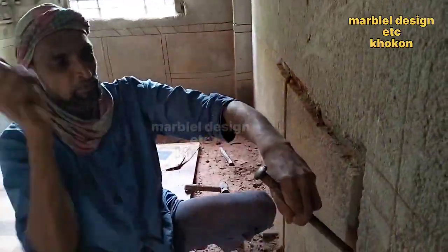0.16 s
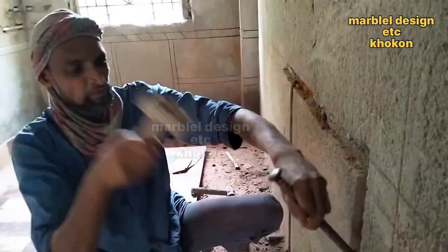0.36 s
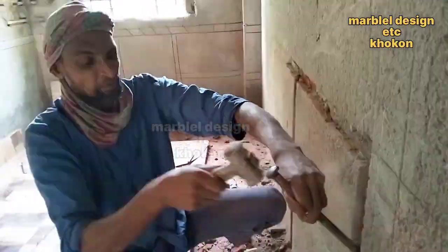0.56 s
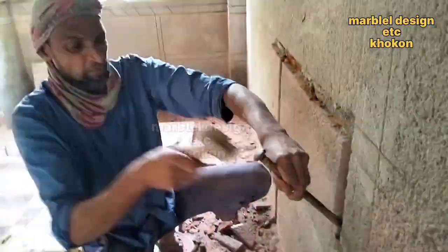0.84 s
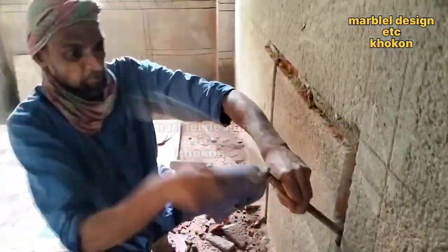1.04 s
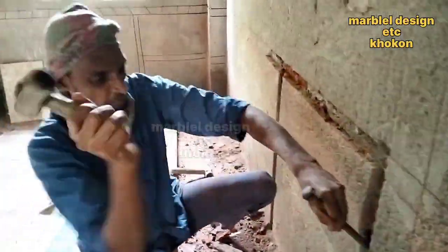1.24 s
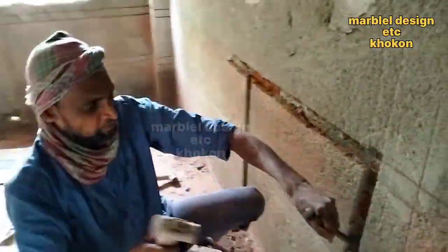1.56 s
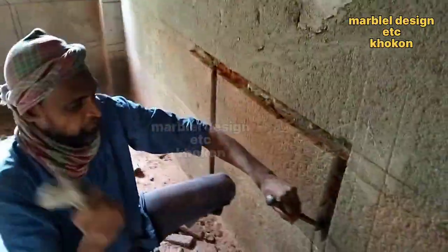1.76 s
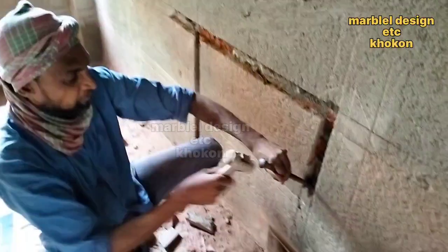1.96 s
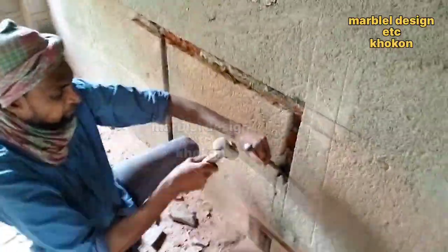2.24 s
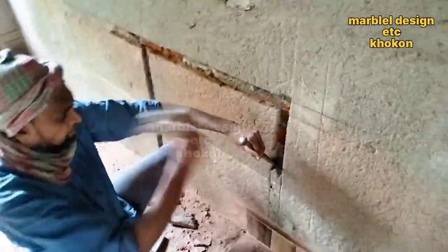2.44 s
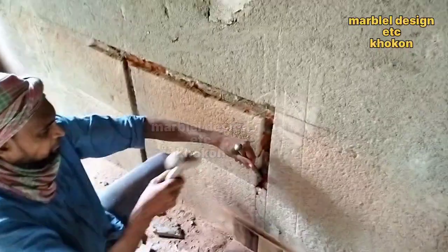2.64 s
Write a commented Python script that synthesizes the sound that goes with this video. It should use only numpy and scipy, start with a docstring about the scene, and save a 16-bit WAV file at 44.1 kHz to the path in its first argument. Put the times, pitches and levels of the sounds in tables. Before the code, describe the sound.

A hammer strikes a steel chisel into a brick wall: five blows, a pause, three more

```python
"""Hammer and chisel on a brick wall

A hammer drives a steel chisel into plastered brick in a bare room: five blows, a pause, three more.
Each blow is gritty noise for crushed masonry, narrow noise bands for the ringing steel and brick,
a thump with decaying sines for the wall, and low bands plus a diffuse tail for the room.
Sharp snaps mark breaking brick; small gritty noises are the chisel scraping and plaster chips falling.
"""
import sys
import numpy as np
from scipy import signal
from scipy.fft import rfft, irfft
from scipy.io import wavfile
from scipy.ndimage import uniform_filter1d

SR = 44100
rng = np.random.default_rng(int(sys.argv[2]) if len(sys.argv) > 2 else 0)


def dump_mix(stems):
    """Bounce the given channels to the path in sys.argv[1] as a 16-bit WAV at rate SR."""
    frames = np.atleast_2d(stems).T  # one column per channel
    limited = np.clip(frames, -1, 1)  # hard clip at full scale
    pcm = np.round(limited * 32767).astype(np.int16)
    wavfile.write(sys.argv[1], SR, pcm)


N = 123480
T = np.arange(SR) / SR  # each sound lasts up to 1 s
HZ = np.fft.rfftfreq(SR, 1 / SR)
MIX_HZ = np.fft.rfftfreq(N, 1 / SR)

# spectrum of crushed masonry: f/Hz, relative density/dB per Hz
CRUNCH_SPECTRUM = [(40, 0.5), (150, 4.5), (350, 2), (600, 4.5), (1300, 1.5), (2000, 0.5), (2800, 4.5),
                   (3600, -0.5), (4500, 2.5), (6200, -1), (7200, -8), (8400, -9.5), (9000, -20.5),
                   (10600, -25), (11600, -19), (13300, -25), (14300, -19), (16000, -34)]
# decay of the room's reverberation: f/Hz, t60/s
ROOM_T60 = [(60, 0.62), (160, 1), (350, 0.94), (600, 0.55), (1200, 0.42), (3000, 0.28), (6000, 0.25),
            (8500, 0.076), (15000, .16)]


def amp(db):
    """Decibels to amplitude gain."""
    return 10 ** (np.asarray(db) / 20)


def unit(x):
    """Scales to rms 1."""
    return x / np.sqrt(np.mean(x ** 2) + 1e-20)


def read(points, hz):
    """Interpolates a table on a log-frequency axis."""
    f, value = np.transpose(points)
    return np.interp(np.log(hz + 1), np.log(f + 1), value)


def hump(hz, centre_hz, octaves):
    """Bell-shaped gain on a log-frequency axis, down to 1/e at the given octaves from the centre."""
    return np.exp(-(np.log2((hz + 1) / centre_hz) / octaves) ** 2)


def add(mix, start_s, sound):
    """Mixes a sound in at its start time."""
    part = mix[max(round(start_s * SR), 0):][:len(sound)]
    part += sound[:len(part)]


def envelope(rise_s, t60_s, hold_s=0):
    """Quadratic build-up, hold and exponential decay."""
    rise_s = max(rise_s, 1e-4)
    build_up = np.minimum(T / rise_s, 1) ** 2
    decay_s = np.maximum(T - rise_s - hold_s, 0)
    return build_up * amp(-60 * decay_s / t60_s)


def colour(x, gain):
    """Filters by a gain per frequency, zero-padded against wrap-around."""
    padded_gain = np.repeat(gain, 2)[:SR + 1]
    return irfft(rfft(x, 2 * SR) * padded_gain)[:SR]


def grains(grit):
    """Noise broken into tiny clumps of random strength."""
    grain_s = 0.00053
    clumps = unit(uniform_filter1d(rng.standard_normal(SR), max(int(grain_s * SR), 1)))
    return unit(rng.standard_normal(SR) * np.exp(grit * clumps))


def ring(hz, width_hz, shape):
    """Resonance blurred by reflections: narrow-band noise with the outline and energy of the envelope."""
    band = np.exp(-2 * ((HZ - hz) / width_hz) ** 2)
    x = irfft(rfft(rng.standard_normal(SR)) * band) * shape
    return unit(x) * np.sqrt(np.mean(shape ** 2))


def masonry(rise_s, body_db, tail_db):
    """The tip crushes brick in a short gritty burst; the brick clinks and the room answers."""
    # brick modes: f/Hz, width/Hz, level/dB before body_db, t60/s
    brick_modes = [(1198, 28, -17, .2), (1500, 90, -17.5, 0.19), (1706, 30, -19.5, .2)]
    grit, crunch_t60_s, crunch_hold_s = 0.23, 0.18, 0.0074
    body_edge_hz = 1780  # body_db fades out above this

    body_gain = amp(body_db / (1 + (HZ / body_edge_hz) ** 4))
    gain = unit(amp(read(CRUNCH_SPECTRUM, HZ))) * body_gain
    burst = colour(grains(grit), gain) * envelope(rise_s, crunch_t60_s, crunch_hold_s)
    clink = sum(amp(body_db + db) * ring(hz, width_hz, envelope(rise_s, t60_s))
                for hz, width_hz, db, t60_s in brick_modes)
    tail = room_tail(gain) * np.minimum(T / (rise_s + 0.019), 1) ** 2
    return burst + clink + amp(tail_db) * tail


def fracture(db, hz):
    """Brick gives way with one sharp snap: a short noise burst around one pitch."""
    rise_s, t60_s, octaves, body_db = 0.0005, 0.014, 0.65, -5.5
    gain = unit(hump(HZ, hz, octaves) + amp(body_db + read(CRUNCH_SPECTRUM, HZ)))
    return amp(db) * colour(rng.standard_normal(SR), gain) * envelope(rise_s, t60_s)


def chisel(rise_s, ring_db, clang_hz, clang_db, ping_db, shimmer_db):
    """Hand-damped steel rings briefly; each grip frees another clang; thin partials linger in the room."""
    # steel modes: f/Hz, width/Hz, level/dB before ring_db, t60/s
    steel_modes = [(2586, 110, -5.5, 0.078), (2728, 50, -8, 0.15), (2840, 50, -12.5, 0.067),
                   (3052, 80, -17, .18), (4340, 160, -12, 0.049), (5105, 140, -3, 0.13),
                   (5390, 200, -2.5, 0.081), (5594, 280, -3, 0.18), (6010, 82, -8.5, 0.061),
                   (6200, 100, -11, 0.09), (8120, 40, -15.5, 0.066)]
    hold_s = 0.0064
    linger_db, linger_width_hz, linger_delay_s = -14, 45, 0.0067
    linger_share = 0.86  # of the room's t60

    modes = [(hz, width_hz, ring_db + db, t60_s) for hz, width_hz, db, t60_s in steel_modes]
    modes += [(clang_hz, 200, clang_db, 0.087), (9790, 200, ping_db, 0.11),
              (11960, 880, shimmer_db, 0.11)]
    near, far = 0, 0
    for hz, width_hz, db, t60_s in modes:
        near = near + amp(db) * ring(hz, width_hz, envelope(rise_s, t60_s, hold_s))
        # the delay lengthens the build-up
        far_shape = envelope(rise_s + linger_delay_s, linger_share * read(ROOM_T60, hz))
        far = far + amp(db) * ring(hz, linger_width_hz, far_shape)
    return near + amp(linger_db) * far


def wall(delay_s, thump_db, hum_db):
    """The wall gives, springs back and hums on its low modes."""
    # wall modes: f/Hz, level/dB before hum_db, t60/s
    wall_modes = [(112.64, -1.5, .62), (92, -3, 0.23)]
    thump_s, hum_rise_s = 0.0035, 0.0098  # thump_s: from zero crossing to each peak
    u = (T - delay_s) / thump_s
    thump = u * np.exp((1 - u ** 2) / 2) * np.minimum(T / 0.002, 1)
    hum = sum(amp(db) * np.sin(2 * np.pi * hz * (T - delay_s)) * envelope(hum_rise_s, t60_s)
              for hz, db, t60_s in wall_modes)
    return amp(thump_db) * thump + amp(hum_db) * hum


def boom(centre_hz):
    """Low room resonances swell and die slowly; those near the centre pitch are driven most."""
    # room modes: f/Hz, width/Hz, level/dB at the centre pitch, t60/s
    room_modes = [(48, 30, -19.5, 0.99), (72.4, 72, -7.5, 0.77), (123.7, 49, -8.5, 1), (169, 88, -6, 0.74),
                  (210.3, 24, -8.5, 0.5), (242.2, 23, -8.5, 0.55), (271.5, 17, -12, 0.57),
                  (316, 22, -5, 0.51), (352, 30, -7, 0.49), (423.6, 44, -7.5, 0.48), (552, 29, -14, .4),
                  (645, 30, -8, 0.22)]
    rise_s, octaves, edge_db = 0.017, 0.75, -9.5  # edge_db: far from the centre pitch
    total = 0
    for hz, width_hz, db, t60_s in room_modes:
        drive_db = edge_db * (1 - hump(hz, centre_hz, octaves))
        total = total + amp(db + drive_db) * ring(hz, width_hz, envelope(rise_s, t60_s))
    return total


def room_tail(gain):
    """Diffuse, patchy reverberation of a sound with this spectrum; each band decays at its own t60."""
    patch_db = 6.5
    hz, t, z = signal.stft(colour(rng.standard_normal(SR), gain), SR, nperseg=256)
    patches = unit(uniform_filter1d(rng.standard_normal(z.shape), size=9, axis=1))
    decay_db = -60 * t / read(ROOM_T60, hz)[:, None]
    z = z * amp(patch_db * patches + decay_db)
    return signal.istft(z, SR, nperseg=256)[1][:SR]


def chip(db, rise_s, t60_s, hz, octaves, grit):
    """A small scrape or tick of loose plaster: banded gritty noise with a faint room tail."""
    fizz_db, room_db = -30.5, -17  # fizz: flat floor under the band
    gain = unit(hump(HZ, hz, octaves) + amp(fizz_db))
    direct = colour(grains(grit), gain) * envelope(rise_s, t60_s)
    tail = room_tail(gain) * np.minimum(T / 0.005, 1)
    return amp(db) * (direct + amp(room_db) * tail)


def lingering():
    """The last of an earlier blow: room boom and reverberation."""
    boom_db, boom_hz, tail_db = -47.5, 120, -61
    tail = room_tail(unit(hump(HZ, 720, 1.6)))
    return amp(boom_db) * boom(boom_hz) + amp(tail_db) * tail


def air():
    """Quiet low background of the building site: steady coloured noise."""
    # background spectrum: f/Hz, relative density/dB per Hz
    air_spectrum = [(25, -8), (60, -2.5), (115, 10), (250, -7), (500, -14.5), (1000, -25.5), (3000, -28.5),
                    (6000, -29.5), (9000, -47), (16000, -58)]
    rms_db = -56
    noise = irfft(rfft(rng.standard_normal(N)) * amp(read(air_spectrum, MIX_HZ)), N)
    return amp(rms_db) * unit(noise)


def widen(mid):
    """Slight treble width: a randomly drifting, 90-degree-shifted copy, opposite in the two channels."""
    # stereo width: f/Hz, side share/ratio
    side_share = [(2800, 0), (5000, 0), (9000, 0.046), (15000, .38)]
    drift = unit(uniform_filter1d(rng.standard_normal(N), size=300))
    side = irfft(1j * rfft(mid * drift) * read(side_share, MIX_HZ), N)
    return np.array([mid + side, mid - side])


def scene():
    """Blows, snaps and chips over the background, centred, with slight width in the treble."""
    # hammer blows: t/s, crunch build-up/s, crunch level/dB, brick body/dB, chisel ring/dB, clang f/Hz,
    # clang/dB, thin ping/dB, top shimmer/dB, reverberation/dB before crunch level, thump delay/s,
    # thump/dB, wall hum/dB, room boom/dB, boom centre f/Hz
    blows = [ (0.244, 0.0042, -17, -2, -20, 5740, -32, -43.5, -34, -9.5, 0.0071, -23.5, -23, -19, 295),
             (0.495, 0.016, -15, -4.5, -19, 5170, -21.5, -43.5, -32.5, -6, 0.0049, -22.5, -20, -22, 297),
             (0.758, 0.0077, -14.5, -4.5, -20.5, 2680, -23.5, -50.5, -31.5, -8.5, 0.012, -12.5, -16.5, -19, 202),
             (1.020, 0.013, -18, 3.5, -29, 4200, -26.5, -29.5, -34.5, -8, 0.0083, -12.5, -18.5, -17.5, 237),
             (1.306, 0.012, -18, -1.5, -24, 6200, -26, -37.5, -34, -8.5, 0.0087, -23.5, -25, -22, 224),
             (1.925, 0.013, -17, 1, -19.5, 4650, -24.5, -26, -30.5, -10, .014, -19, -27.5, -19, 357),
             (2.185, 0.013, -14, -4.5, -17.5, 2663, -22, -63, -25.5, -11, 0.018, -14, -24.5, -19, 268.5),
             (2.458, 0.015, -16.5, 3, -25, 8190, -26, -25, -28, -14, 0.0092, -30, -50.5, -21.5, 311)]
    # snaps of breaking brick: t/s, level/dB, centre f/Hz
    fractures = [(.247, -35, 4000), (.7625, -10, 5040), (0.771, -24.5, 9000), (1.024, -7, 3540),
                 (1.942, -6.5, 5000), (2.191, -14.5, 3560), (2.221, -8.5, 5150), (2.478, -8.5, 2570)]
    # scrapes and falling chips: t/s, level/dB, build-up/s, t60/s, centre f/Hz, width/octaves, grit/0-1
    chips = [(0.22, -40.5, 0.019, 0.6, 2780, 1.26, .3), (.600, -66, .002, 0.046, 3000, 1.7, .6),
             (0.685, -55.5, 0.0032, .1, 2950, 0.99, .5), (0.936, -57.5, 0.01, 0.46, 4470, 0.73, .8),
             (1.246, -43.5, .012, 0.34, 1170, 1.34, .4), (1.433, -33, 0.02, 0.14, 2220, 1.15, .5),
             (1.454, -26, 0.0016, 0.031, 2470, 0.72, .7), (1.489, -40.5, 0.0046, 0.14, 3200, 0.75, .5),
             (1.553, -62, 0.0038, 0.23, 4000, 1.4, .7), (1.638, -66, .008, 0.14, 4600, 1.6, .8),
             (2.396, -34, 0.00032, 0.011, 2400, 0.75, 0), (2.611, -39.5, 0.0014, 0.38, 2320, 1.1, .5),
             (2.625, -30, 0.00062, 0.042, 2380, 1.18, .6), (2.659, -47, 0.0045, 0.16, 5640, 0.11, .3),
             (2.749, -57, 0.000492, 0.035, 2970, 0.28, 0.06)]

    mid = air()
    add(mid, 0, lingering())
    for (start_s, rise_s, crunch_db, body_db, ring_db, clang_hz, clang_db, ping_db, shimmer_db,
         tail_db, delay_s, thump_db, hum_db, boom_db, boom_hz) in blows:
        add(mid, start_s, amp(crunch_db) * masonry(rise_s, body_db, tail_db))
        add(mid, start_s, chisel(rise_s, ring_db, clang_hz, clang_db, ping_db, shimmer_db))
        add(mid, start_s, wall(delay_s, thump_db, hum_db))
        add(mid, start_s, amp(boom_db) * boom(boom_hz))
    for start_s, *settings in fractures:
        add(mid, start_s, fracture(*settings))
    for start_s, *settings in chips:
        add(mid, start_s, chip(*settings))
    return widen(mid)


def record(dry):
    """Peaks round off near full scale; then a low-pass limits the band."""
    peak_limit, edge_hz = 0.92, 16000
    held = dry / (1 + (dry / peak_limit) ** 6) ** (1 / 6)
    low_pass = signal.firwin(255, edge_hz, window=("kaiser", 9), fs=SR)
    return signal.oaconvolve(held, low_pass[None], "same")


dry = scene()
out = record(dry)
dump_mix(out)
```